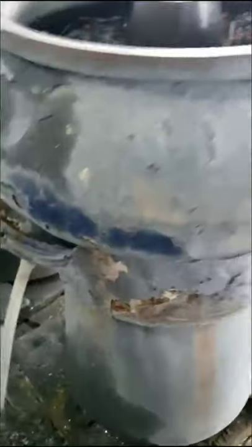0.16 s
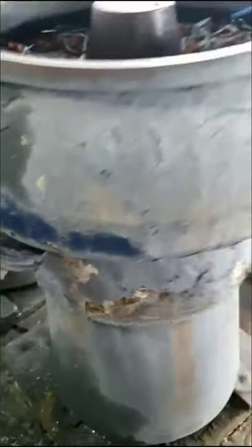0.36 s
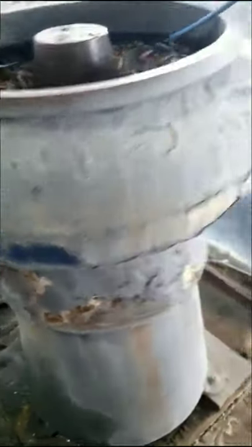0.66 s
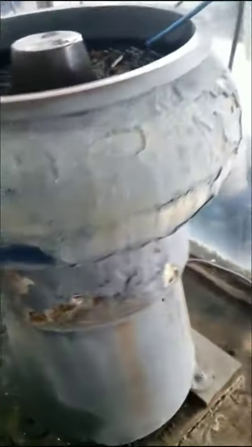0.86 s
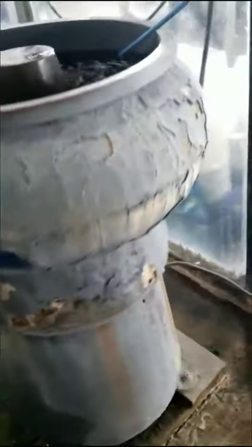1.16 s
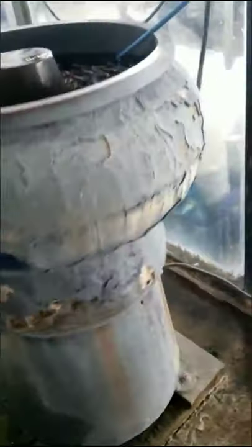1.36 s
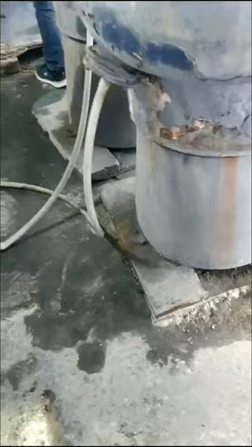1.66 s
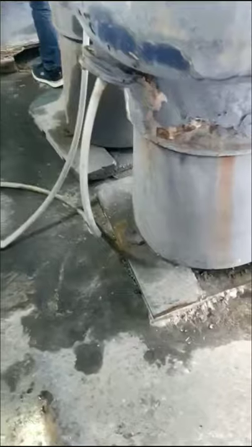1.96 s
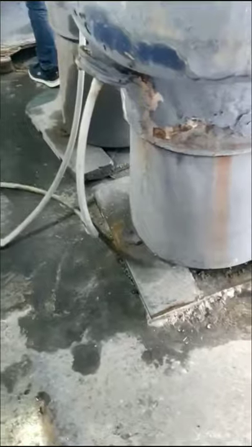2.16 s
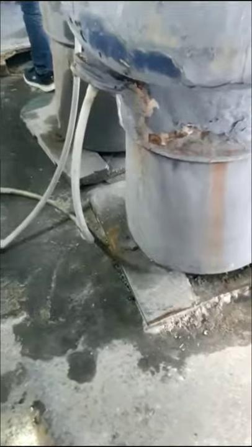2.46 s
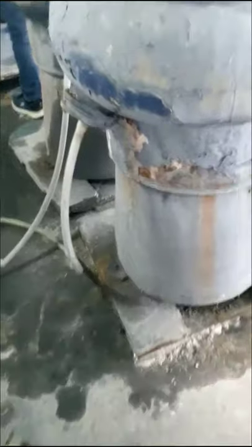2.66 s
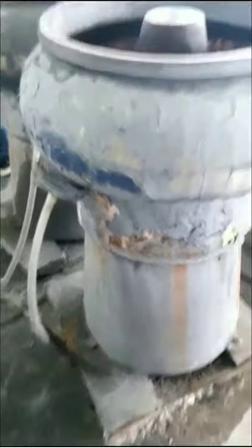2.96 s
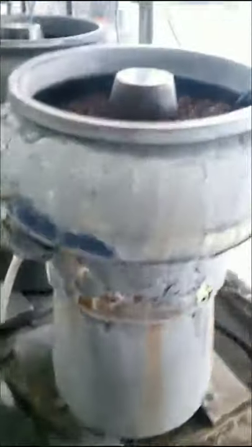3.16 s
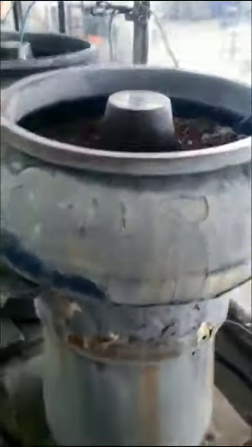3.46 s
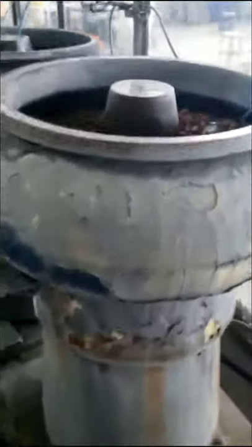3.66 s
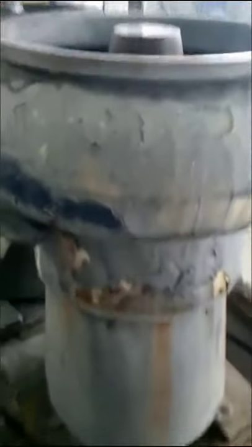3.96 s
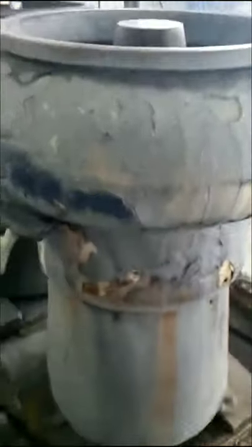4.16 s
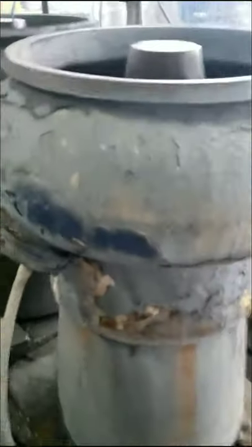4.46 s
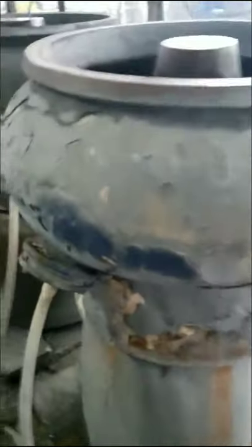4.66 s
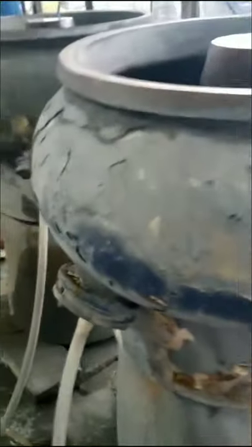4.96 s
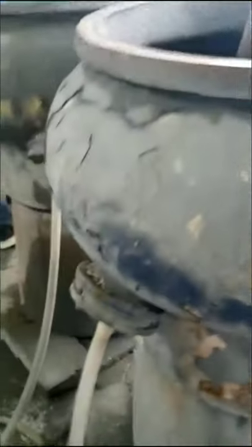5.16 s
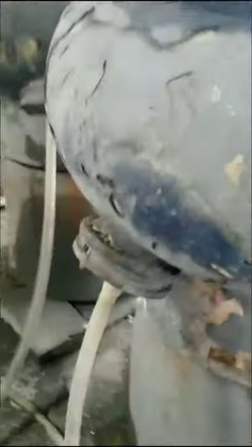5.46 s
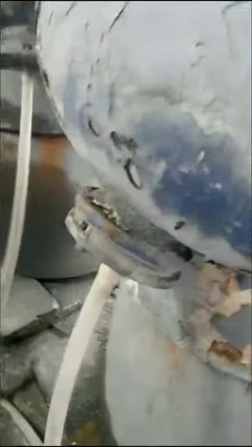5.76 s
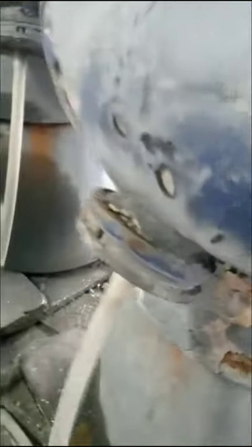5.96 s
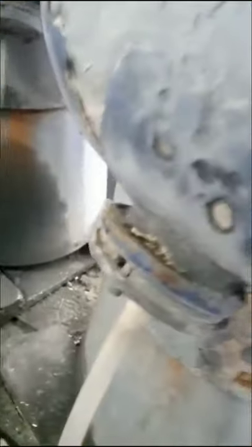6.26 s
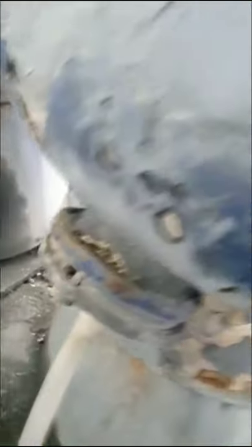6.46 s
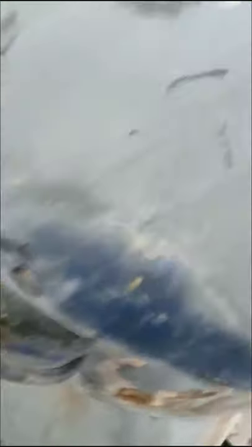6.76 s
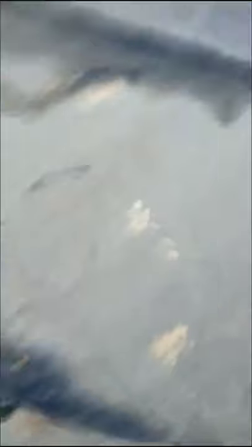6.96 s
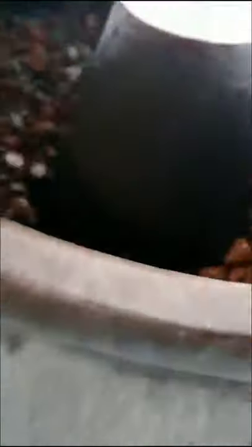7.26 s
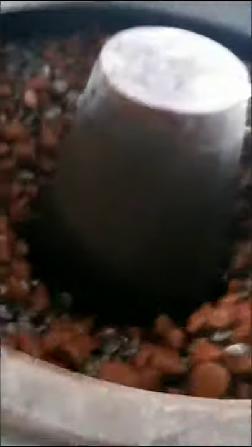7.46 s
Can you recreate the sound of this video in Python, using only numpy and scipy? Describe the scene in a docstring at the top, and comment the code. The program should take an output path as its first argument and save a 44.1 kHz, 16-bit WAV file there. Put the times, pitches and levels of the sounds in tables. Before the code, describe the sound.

Loud continuous hissing rattle of churning chips and metal over a deep fluttering boom and hum, cut silent for a moment early on.

```python
"""A vibratory polishing machine runs in a workshop, heard through a hand-held microphone that moves around it.
First comes a view beside it: an unbalanced motor hums and shakes a steel bowl, whose wall booms and rings
as thousands of chips and metal pieces collide in it. Other machines hum nearby.
At about 1.5 s the sound drops out for a fifth of a second, then returns from a second standpoint.
From about 6.8 s the microphone passes over the rim and the rattle changes colour."""
import sys
import numpy as np
from scipy import signal
from scipy.fft import rfft, irfft
from scipy.io import wavfile
from scipy.ndimage import uniform_filter1d

SR = 44100
rng = np.random.default_rng(int(sys.argv[2]) if len(sys.argv) > 2 else 0)


def waveform_to_disk(signal):
    """Save audio, clipped to [-1, 1], as 16-bit WAV at the path in sys.argv[1]."""
    frames = np.transpose(np.atleast_2d(signal))
    scaled = np.clip(frames, -1, 1) * 32767
    samples = np.round(scaled).astype(np.int16)
    wavfile.write(sys.argv[1], SR, samples)


N = 336042
TIME = np.arange(N) / SR  # s
FREQ = np.maximum(np.arange(N // 2 + 1) * SR / N, 1e-3)  # Hz, kept above zero for the divisions
GAP_START, GAP_END = 1.476, 1.6705  # s

# the two deep modes (natural tones) of the loaded bowl: (pitch [Hz], width [Hz], level trim [dB])
DEEP_MODES = [(180.2, 9.5, -4), (233, 7.5, -0.5)]


def undb(db):
    """Turn decibels into a gain."""
    return 10 ** (np.asarray(db) / 20)


def unit(x):
    """Scale a sound to an rms (average strength) of one."""
    return x / np.sqrt(np.mean(x ** 2))


def walk(rate):
    """Wander smoothly at random with an rms of one, changing about rate times a second."""
    noise = rfft(rng.standard_normal(N))
    return unit(irfft(noise / (1 + (FREQ / rate) ** 4), N))


def track(points):
    """Join (time [s], value) points with straight lines."""
    return np.interp(TIME, *np.transpose(points))


def colour(x, points):
    """Filter by an outline of (frequency [Hz], relative level [dB]), then scale to an rms of one."""
    hz, db = np.transpose(points)
    outline_db = np.interp(np.log(FREQ), np.log(hz), db)
    return unit(irfft(rfft(x) * undb(outline_db), N))


def ring(x, hz, width):
    """Pass a sound through one resonance, its skirts steepened by a second pass."""
    detuning = (FREQ / hz - hz / FREQ) * hz / (1.5 * width)
    return irfft(rfft(x) / (1 + 1j * detuning) ** 2, N)


def impacts(per_second, scatter_db):
    """Make randomly timed blows of unequal strength."""
    struck = rng.random(N) < per_second / SR
    strength = rng.standard_normal(N) * undb(scatter_db * rng.standard_normal(N))
    return unit(struck * strength)


def swell(s, length):
    """Rise and fall smoothly about the moment s."""
    return np.exp(-np.minimum(np.square((TIME - s) / length), 50))


def wavering(hz, flutter):
    """Make a tone with an rms of one whose phase wanders by flutter, in radians."""
    return np.sqrt(2) * np.sin(2 * np.pi * (hz * TIME + rng.random()) + flutter)


def neighbours():
    """Machines further off hum steadily, each wavering a little in pitch and level."""
    # average hum of each tone: (pitch [Hz], level [dB])
    hums = [(45, -55), (57.7, -56), (75.3, -49.5), (104.5, -52), (207.5, -45), (267, -51.5), (321, -49),
            (326, -49.5), (355.5, -49.5)]
    out = 0
    for hz, db in hums:
        level = undb(db + 2.7 * walk(2.3))
        out = out + level * np.sin(2 * np.pi * hz * TIME + 0.89 * walk(0.76))
    return np.sqrt(2) * out  # the levels are rms


def hollow_tones():
    """Brief hollow sounds swell out of the rattle, some sagging in pitch, and linger in the workshop."""
    # short tones: (time [s], pitch [Hz], glide [Hz per s], flutters [per s], half-length [s], level [dB])
    tones = [(1.222, 325, 0, 12, 0.066, -27.5), (7.033, 531, -250, 25, 0.029, -26.5),
             (7.068, 352, 0, 30, 0.03, -32), (7.246, 517, 0, 25.5, 0.018, -27),
             (7.248, 425, -900, 40, 0.026, -29)]
    room_db, room_t60 = -7, 0.57  # echo level; seconds for it to fall by 60 dB
    out = 0
    for s, hz, glide, rate, length, db in tones:
        bend = np.pi * glide * (TIME - s) ** 2
        out = out + undb(db) * swell(s, length) * wavering(hz, 0.4 * walk(rate) + bend)
    tail = rng.standard_normal(SR) * undb(-60 * TIME[:SR] / room_t60)
    echo = signal.fftconvolve(out, tail / np.linalg.norm(tail))[:N]
    return out + undb(room_db) * echo


def motor(turns, shake_db, hum_db, drone_db):
    """The off-centre weights rock the bowl once a turn; springs and base add overtones."""
    # hum before its changes over time: (multiple of the shaft rate, level [dB])
    overtones = [(1, -36), (2, -40), (3, -41.5), (4, -46), (5, -43.5), (6, -43.5), (9, -49.5), (11, -48.5)]
    out = 0
    for k, (order, db) in enumerate(overtones):
        # the first three follow their own level changes, the rest follow the hum weakly
        near_db = (shake_db, hum_db, drone_db)[k] if k < 3 else 0.22 * hum_db
        level = undb(db + near_db + 0.4 * walk(2.2))
        out = out + level * np.sin(2 * np.pi * (order * turns + rng.random()))
    return np.sqrt(2) * out  # the levels are rms


def faint_pings():
    """A few faint, high, short pings sound within the rattle: pure tones that die away quickly."""
    # pings: (time [s], pitch [Hz], peak level [dB])
    pings = [(1.015, 3596, -26), (1.825, 3617, -23), (2.665, 4242, -26.5), (3.015, 5146, -27),
             (3.685, 5038, -25), (5.335, 4371, -24)]
    t60 = 0.2  # s to fall by 60 dB
    out = 0
    for s, hz, db in pings:
        age = np.maximum(TIME - s, 0)
        out = out + undb(db - 60 * age / t60) * np.sin(2 * np.pi * hz * age)
    return out


def boom(hz, width):
    """The load kicks a deep mode: it flutters, while the steady drive evens out its slow swells."""
    tone = ring(impacts(per_second=900, scatter_db=1.5), hz, width)
    slow_level = np.sqrt(uniform_filter1d(tone ** 2, size=SR // 10))
    return unit(tone / slow_level)


def nearest_mode(hz):
    """Find which deep mode lies closest to a pitch."""
    return np.argmin([abs(hz - mode[0]) for mode in DEEP_MODES])


def deep_modes(lower_db, upper_db):
    """Two deep modes boom on: in a lull one softens, in a surge it is pulled to a set pitch and level."""
    # lulls, moments when one deep mode booms more softly:
    # (time [s], pitch near the mode [Hz], half-length [s])
    lulls = [(.21, 180, .05), (.28, 233, 0.066), (.52, 180, 0.034), (.52, 233, .06), (1.24, 233, 0.055),
             (1.85, 180, .06), (2.142, 180, .04), (2.29, 233, 0.073), (2.83, 180, 0.068),
             (3.41, 233, 0.042), (3.75, 233, .05), (3.91, 180, .05), (4.13, 233, .04), (4.762, 180, 0.044),
             (4.803, 233, 0.044), (5.28, 233, 0.042), (5.442, 180, 0.066), (6.01, 180, 0.077),
             (6.631, 180, 0.034), (6.99, 180, .07)]
    # surges, moments when one deep mode booms louder: (time [s], pitch [Hz], half-length [s], level [dB])
    surges = [(0.117, 231, .04, -23.5), (.13, 181, 0.017, -29.5), (.36, 229, .02, -27),
              (.37, 183, .03, -29), (0.634, 227, 0.023, -27.5), (1.749, 238, 0.048, -25.5),
              (1.853, 232, .012, -24), (1.917, 231, 0.024, -24), (1.983, 180, .035, -29),
              (2.112, 229.6, 0.02, -24), (2.25, 179, .022, -26), (2.37, 181, 0.028, -27),
              (2.4, 232, 0.022, -23.5), (2.514, 235.5, 0.03, -23), (2.583, 183, 0.045, -28.5),
              (2.59, 238, .017, -27), (2.71, 179, .02, -26), (2.78, 227, .017, -25),
              (2.95, 232, 0.021, -21), (3.188, 181, .023, -27), (3.2, 229, 0.02, -25.5),
              (3.288, 234, .019, -25), (3.35, 178.5, .05, -25.5), (3.551, 226, 0.047, -25.5),
              (3.63, 179, .025, -25), (3.646, 234, 0.033, -26), (4, 181.3, 0.021, -27),
              (4.046, 231.5, 0.028, -22.5), (4.185, 182.5, 0.029, -25), (4.2, 229, .02, -24),
              (4.294, 235.5, 0.035, -25), (4.428, 178, 0.024, -24), (4.5, 235.5, 0.024, -23),
              (4.61, 184, 0.018, -23), (4.632, 231.5, 0.058, -22), (4.965, 231.5, 0.036, -21),
              (4.98, 177, .05, -30), (5.118, 178.6, .022, -25), (5.185, 231, 0.047, -23),
              (5.189, 177, .028, -26), (5.36, 178.8, 0.019, -25), (5.36, 234, .02, -27),
              (5.719, 177, .021, -22.5), (5.73, 232, 0.018, -21.6), (5.862, 181, .034, -25),
              (5.87, 239, 0.027, -20), (5.963, 230.5, 0.028, -20.5), (6.17, 180.5, 0.057, -25.5),
              (6.295, 179, 0.033, -25), (6.344, 239, 0.031, -25.5), (6.505, 231.3, 0.03, -26),
              (6.675, 233.5, 0.04, -21.2), (6.762, 234.6, 0.019, -23.5), (6.834, 177, .04, -25.3),
              (6.898, 233.3, 0.047, -20), (7.118, 232, 0.019, -21.6), (7.201, 232, 0.016, -20),
              (7.289, 180, .024, -31), (7.314, 234, 0.044, -21.5), (7.42, 230, .026, -25.3),
              (7.487, 180, .028, -25)]
    boom_db, lull_db = -29.5, -9.5  # level before trims and movement; change at the middle of a lull
    sizes, pitches = [], []
    for (hz, width, trim_db), near_db in zip(DEEP_MODES, (lower_db, upper_db)):
        # split each mode into its size and its pitch from moment to moment
        mode = signal.hilbert(undb(boom_db + trim_db + near_db) * boom(hz, width))
        sizes.append(np.abs(mode))
        pitches.append(np.gradient(np.unwrap(np.angle(mode))) * SR / (2 * np.pi))
    for s, hz, length in lulls:
        k = nearest_mode(hz)
        sizes[k] = sizes[k] * undb(lull_db * swell(s, length))
    for s, hz, length, db in surges:
        k, share = nearest_mode(hz), swell(s, length)
        sizes[k] = sizes[k] + share * (np.sqrt(2) * undb(db) - sizes[k])
        pitches[k] = pitches[k] + share * (hz - pitches[k])
    out = 0
    for size, pitch in zip(sizes, pitches):
        phase = 2 * np.pi * np.cumsum(pitch) / SR
        out = out + size * np.sin(phase + 0.12 * walk(20))
    return out


def wall_ringing():
    """Blows from the load make the steel wall ring; each mode comes and goes as the load rolls past."""
    # modes of the wall: (pitch [Hz], width [Hz], relative level [dB])
    wall_modes = [(325.5, 31, -7.5), (555, 96, 0.5), (650, 59, 1), (740, 47, 2.5), (973, 21, -0.5),
                  (1136, 31, 5), (1273, 67, -1), (1355, 45, 1.5), (1620, 130, -4), (1820, 67, 0),
                  (2980, 430, -4), (3516, 290, -3), (4240, 240, -3.5)]
    out = 0
    for hz, width, db in wall_modes:
        blows = impacts(per_second=5000, scatter_db=0.5)
        out = out + undb(db + 0.79 * walk(4.8)) * ring(blows, hz, width)
    return unit(out)


def ring_outs():
    """Now and then a wall mode rings out as the load presses on it."""
    # ring-outs: (time [s], pitch [Hz], flutter rate [per s], half-length [s], level [dB])
    moments = [(.37, 660, 30, 0.068, -30.5), (.71, 648, 30, 0.15, -34), (1.81, 1291, 35, .05, -33),
               (1.937, 753, 35, .05, -31), (1.94, 1350, 40, 0.099, -33), (2.24, 1290, 35, .06, -31),
               (2.377, 1808, 75, .07, -34), (2.66, 1818, 70, 0.11, -32), (2.817, 1141, 30, .06, -32),
               (2.9, 1356, 35, .04, -31), (3.078, 1360, 40, 0.099, -34), (3.171, 1808, 40, .03, -34.5),
               (3.365, 1184, 35.1, 0.034, -34), (3.774, 1820, 40.3, .06, -30), (4.153, 1790, 40, .07, -32),
               (4.563, 745, 35, 0.071, -34), (5.19, 1340, 40, 0.081, -31), (6.1, 2885, 160, .2, -34),
               (6.47, 2980, 118.3, .08, -35), (6.656, 1330, 45, 0.076, -33)]
    out = 0
    for s, hz, rate, length, db in moments:
        out = out + undb(db) * swell(s, length) * wavering(hz, 0.93 * walk(rate))
    return out


def bowl(lower_db, upper_db, rumble_db, wall_db):
    """The load thuds on the bowl: two deep modes boom, the wall rings, the heap rumbles."""
    # low rumble of the churning load: (frequency [Hz], relative level [dB])
    rumble_outline = [(15, -20.5), (40, -14), (65, -8.5), (100, -5.5), (135, -4.5), (165, 0.5), (205, 3.5),
                      (260, 0), (350, -4.5), (450, -8.5), (800, -25), (2000, -62)]
    wall = undb(-29 + wall_db) * wall_ringing()
    heap = colour(impacts(per_second=3700, scatter_db=2.0), rumble_outline)
    rumble = undb(-29.5 + rumble_db) * heap
    return deep_modes(lower_db, upper_db) + wall + ring_outs() + rumble


def clinks(count, low_hz, high_hz, t60, range_db):
    """Metal pieces on top of the heap strike each other and ring briefly, each at its own pitch."""
    t = TIME[:SR // 10]
    out = np.zeros(N + len(t))
    for when, pitch, force in rng.random((count, 3)):
        hz = low_hz + (high_hz - low_hz) * pitch
        start = int(when * N)
        level = undb(range_db * force - 60 * t / t60)
        out[start:start + len(t)] += level * np.sin(2 * np.pi * hz * t)
    return unit(out[:N])


def chips(turns):
    """Chips and metal collide, more at each toss; the rim shades their treble until one hears over it."""
    # colour from the first standpoint, beside the bowl, and over its rim:
    # each is (frequency [Hz], relative level [dB])
    first_view = [(150, -23), (330, 3), (600, 2.5), (900, 0), (1300, 3), (2200, 0), (4000, -1.5),
                  (5200, -4), (6250, -4.5), (6800, -10.5), (8000, -12), (9800, -20.5), (12600, -14.5),
                  (13500, -64)]
    side_view = [(300, -4.5), (600, 0), (900, -0.5), (1300, 1.5), (2200, 0), (3000, 0.5), (4400, -0.5),
                 (5700, -1), (6400, -4), (7300, -8.5), (10000, -11), (11000, -15.5), (11900, -29),
                 (13000, -79)]
    rim_view = [(300, -7), (610, -3), (760, -2), (970, -7.5), (1250, -0.5), (2400, -6.5), (3100, -3),
                (4400, -3), (5700, -3), (6400, -6), (7300, -9), (10000, -10.5), (11000, -14), (11900, -21),
                (13000, -52)]
    # how far the microphone is over the rim: (time [s], share [0 to 1])
    rim_share = [(6.75, 0.01), (7.2, 0.91), (7.62, 1)]
    # slight brief changes in the level of the rattle, up or down:
    # (time [s], half-length [s], level change [dB])
    level_changes = [(0.323, 0.027, 1), (0.712, 0.018, 0.5), (1.81, .02, -0.5), (2.21, .02, 0.5),
                     (2.62, .13, 0.5), (2.97, 0.017, 0), (5.257, .02, -1)]
    toss_db = 0.68 * np.sin(2 * np.pi * turns) + 0.31 * walk(22) + 0.5 * walk(97)
    clicks = impacts(per_second=11000, scatter_db=1.8) * undb(toss_db)
    metal = clinks(count=3500, low_hz=1493.0, high_hz=11040, t60=0.11, range_db=10.0)
    # collisions deep in the heap and echoes from hard walls merge into an even wash
    wash = undb(2.5) * rng.standard_normal(N)
    load = unit(clicks + undb(-7.0) * metal + wash)
    over = track(rim_share)
    later = (1 - over) * colour(load, side_view) + over * colour(load, rim_view)
    rattle = np.where(TIME < GAP_END, colour(load, first_view), later)
    change_db = sum(db * swell(s, length) for s, length, db in level_changes)
    return undb(-20.5 + change_db) * rattle


def scene():
    """Motor, bowl, load and neighbours meet at one microphone, the same in both ears."""
    # level changes as the microphone moves round the machine: (time [s], shaking [dB],
    # lower boom [dB], upper boom [dB], rumble [dB], wall [dB])
    near = [(0, 0, -7, -3, 1, -1), (1.45, -4, -1, -4, -1.5, 2.5), (1.7, -9.5, -4, -1.5, 2, 3.5),
            (2.8, -1, 2.5, -3, -1.5, 0.5), (4.2, 1.5, -2, -2, -1, 1), (5.299, 3, -1.5, -1, -2, 0.5),
            (6.6, 6, 2, 1.5, -0.5, 1.5), (7.2, -1, -2, -0.5, 1.5, -2), (7.6, -6, -2, -1.5, -0.5, -2.5)]
    # the hum at twice the shaft rate stands in the room, and the microphone passes through
    # its nodes (quiet spots): (time [s], level change [dB])
    hum_changes = [(0, 2), (.3, 0), (.43, 10), (.62, 3), (1.05, -3), (1.4, 4), (2.2, -3.5), (3.05, -11),
                   (3.4, 3), (3.8, 1.5), (4.7, 6), (5.4, 5), (6.2, -3), (6.55, -11.5), (7.05, -3),
                   (7.6, -24)]
    # the drone at three times the shaft rate has nodes of its own: (time [s], level change [dB])
    drone_changes = [(0, 3), (2.1, 3.5), (2.7, -8), (3.1, -1), (3.85, 4.5), (4.5, 2), (5.25, -2),
                     (5.7, 1.5), (6.4, -1.5), (7.1, -10), (7.6, -13)]
    s, *columns = np.transpose(near)
    shake_db, lower_db, upper_db, rumble_db, wall_db = (np.interp(TIME, s, c) for c in columns)
    shaft_hz = 29.6 * (1 + 0.0019 * walk(1.0))  # the speed drifts a little
    turns = np.cumsum(shaft_hz) / SR
    mono = neighbours() + hollow_tones() + faint_pings()
    mono = mono + motor(turns, shake_db, track(hum_changes), track(drone_changes))
    mono = mono + bowl(lower_db, upper_db, rumble_db, wall_db) + chips(turns)
    return np.array([mono, mono])


def record(dry):
    """The sound drops out between the standpoints, and everything above 13 kHz is cut."""
    outside_gap = (TIME < GAP_START) | (TIME > GAP_END)
    running = uniform_filter1d(1.0 * outside_gap, size=40)  # softens the edges
    # the sound fades quickly and dully into silence at both edges of the gap
    from_edge = np.maximum(np.minimum(TIME - GAP_START, GAP_END - TIME), 0)
    dull = signal.sosfilt(signal.butter(1, 300, fs=SR, output="sos"), dry)
    fade = undb(-39 - 770 * from_edge) * dull
    top_cut = signal.ellip(8, 0.2, 80, 13000, fs=SR, output="sos")
    return signal.sosfilt(top_cut, running * dry + (1 - running) * fade)


dry = scene()
out = record(dry)
waveform_to_disk(out)
```